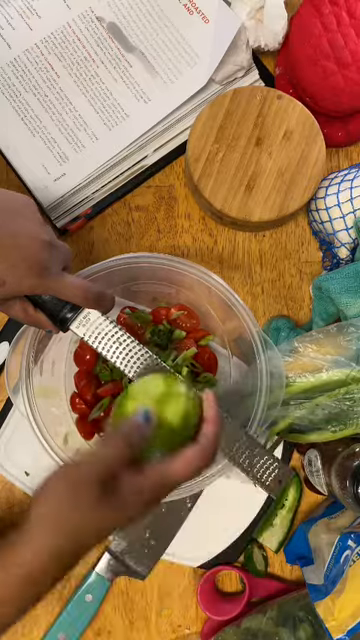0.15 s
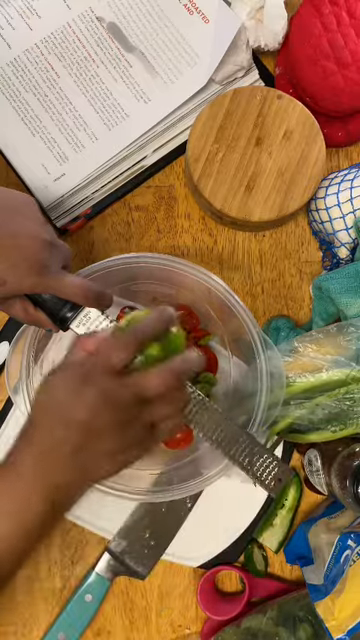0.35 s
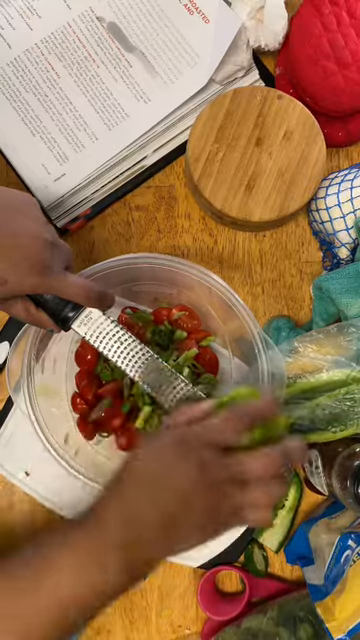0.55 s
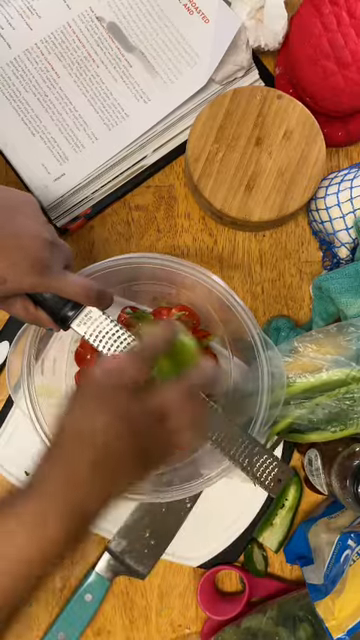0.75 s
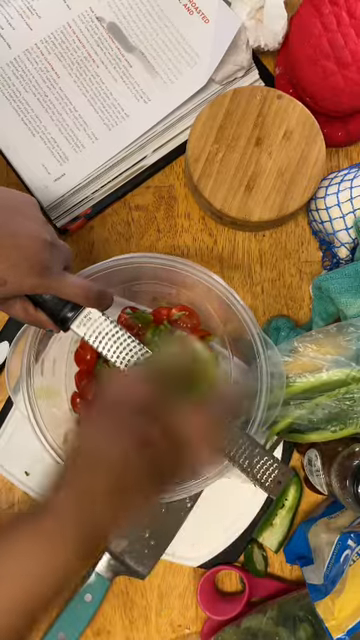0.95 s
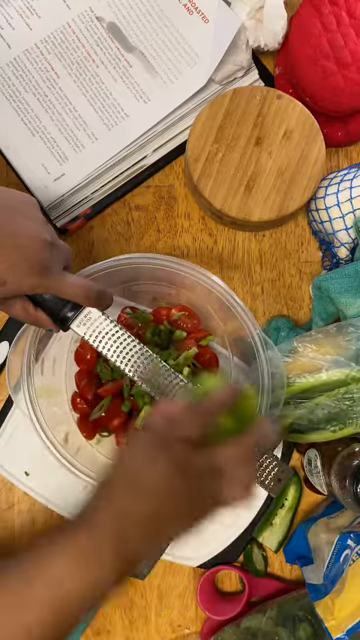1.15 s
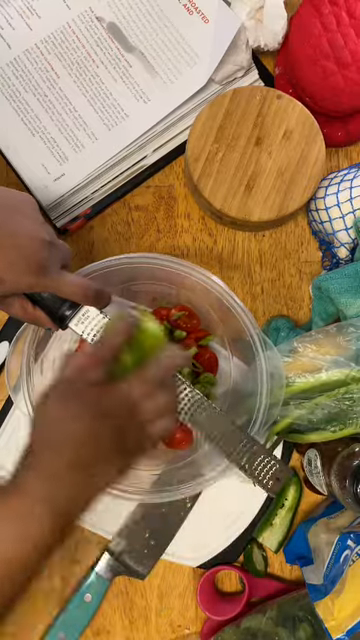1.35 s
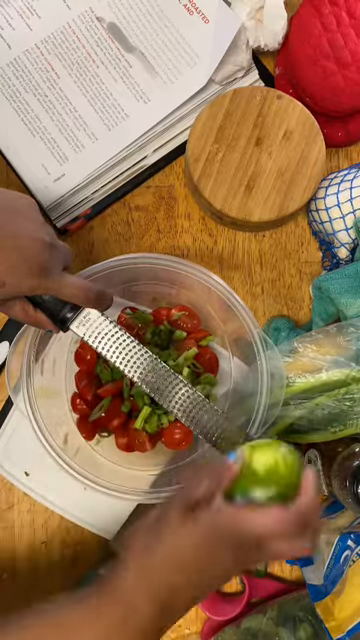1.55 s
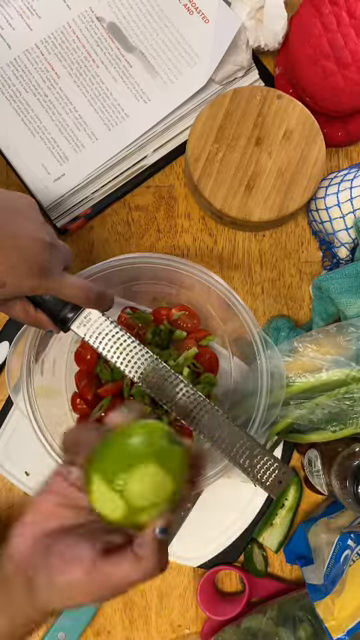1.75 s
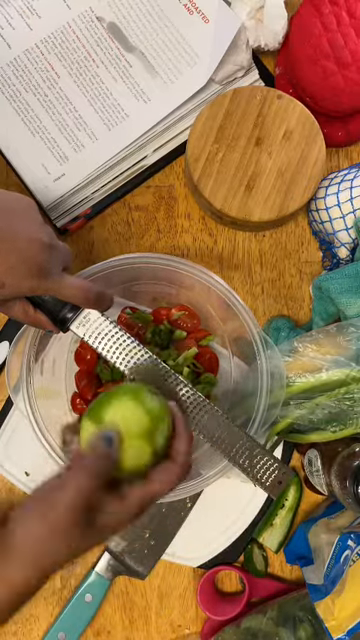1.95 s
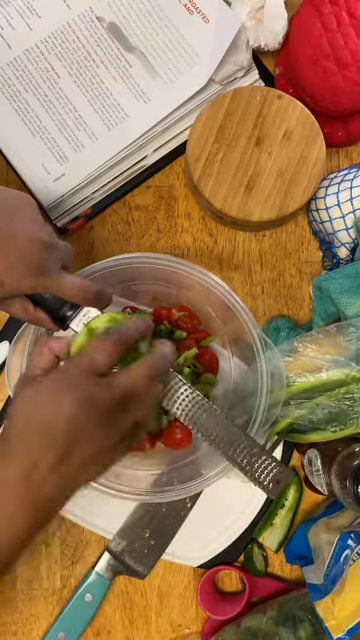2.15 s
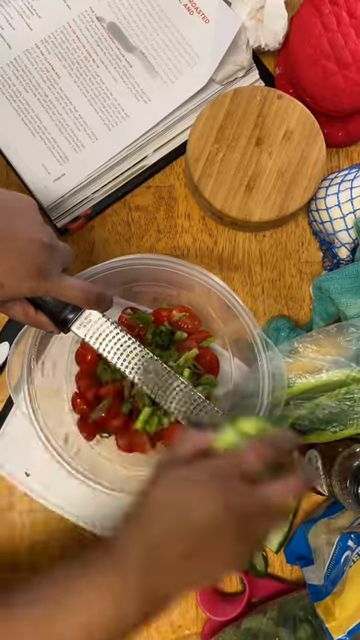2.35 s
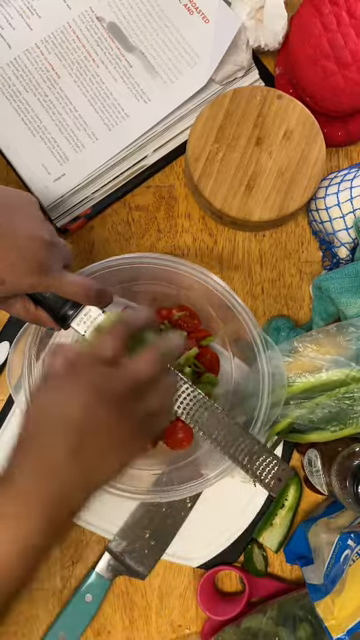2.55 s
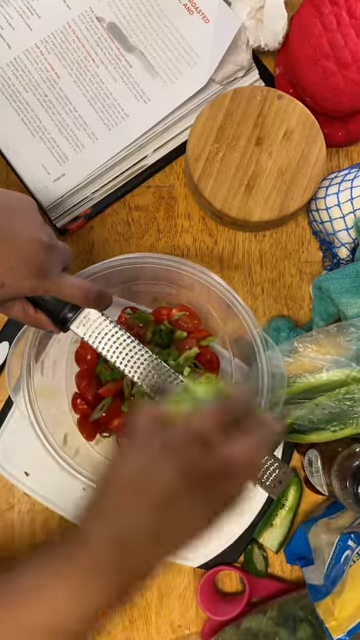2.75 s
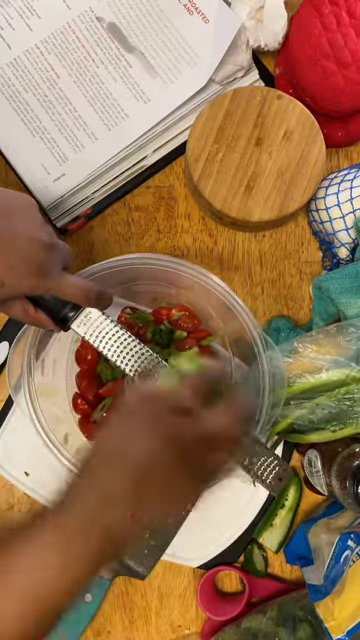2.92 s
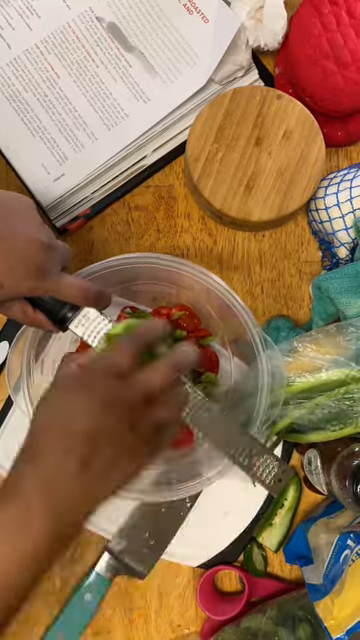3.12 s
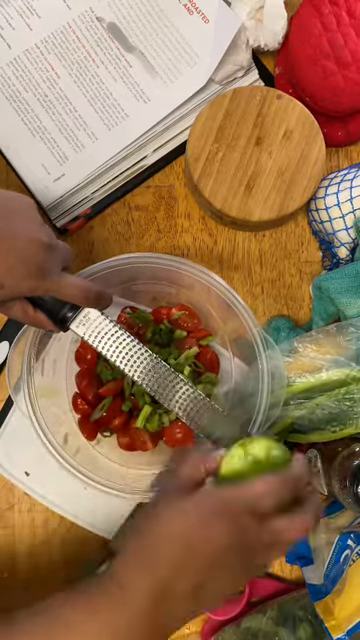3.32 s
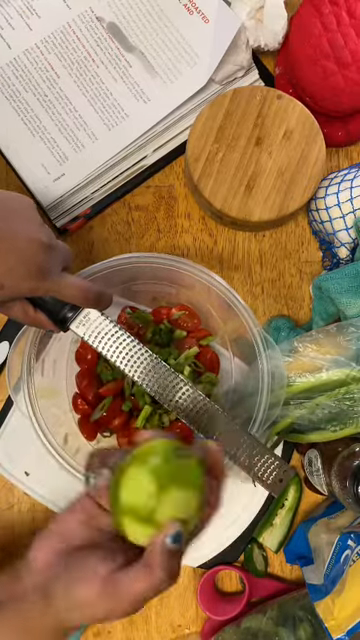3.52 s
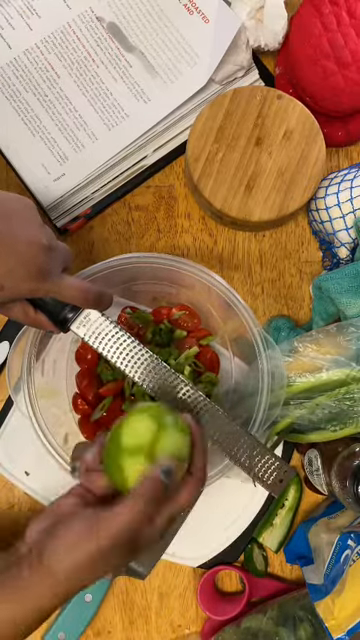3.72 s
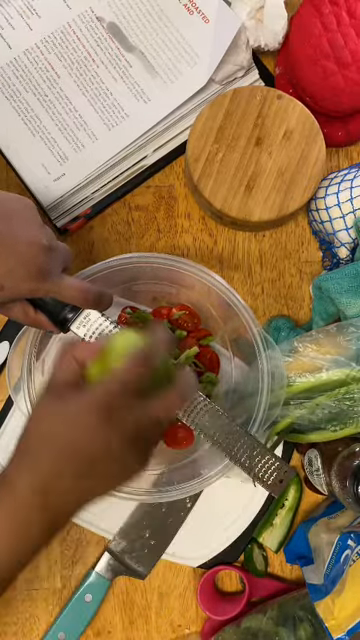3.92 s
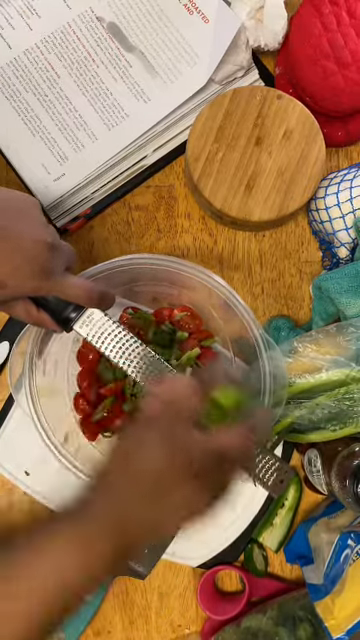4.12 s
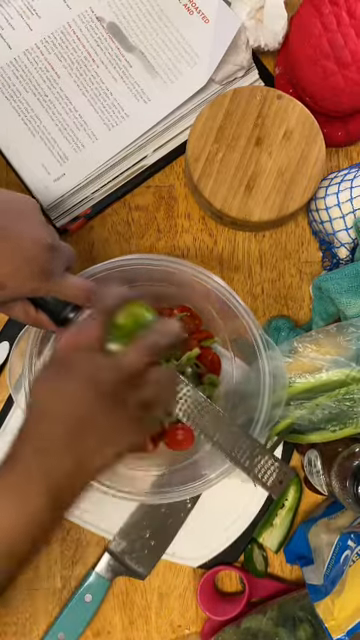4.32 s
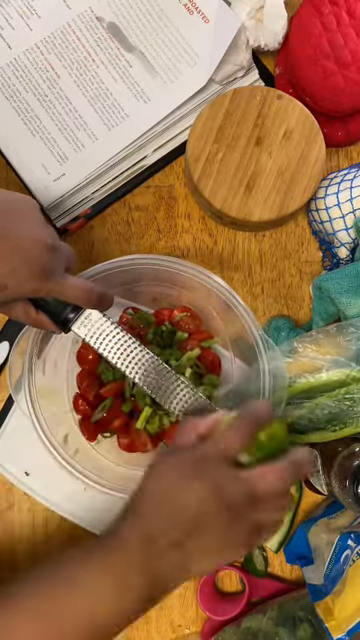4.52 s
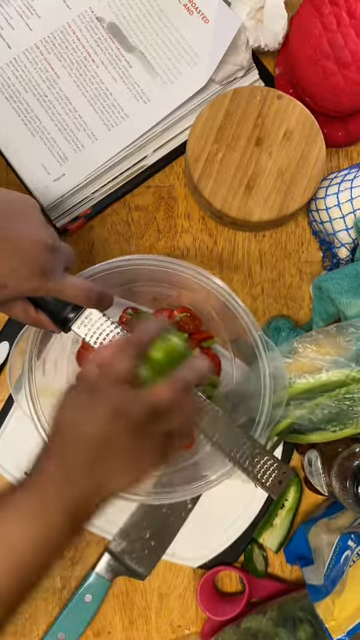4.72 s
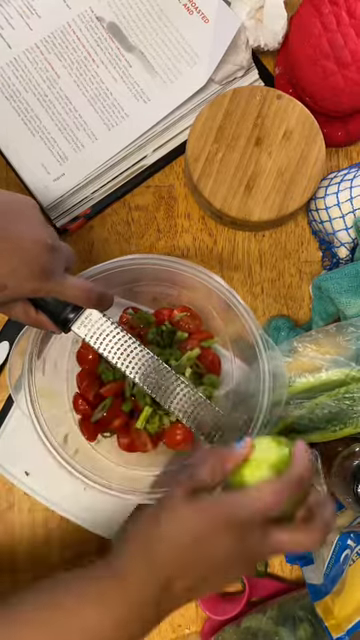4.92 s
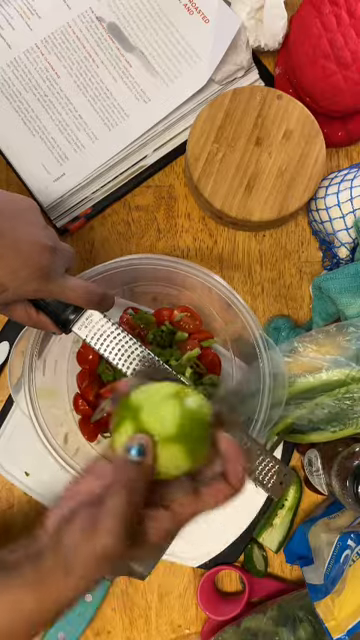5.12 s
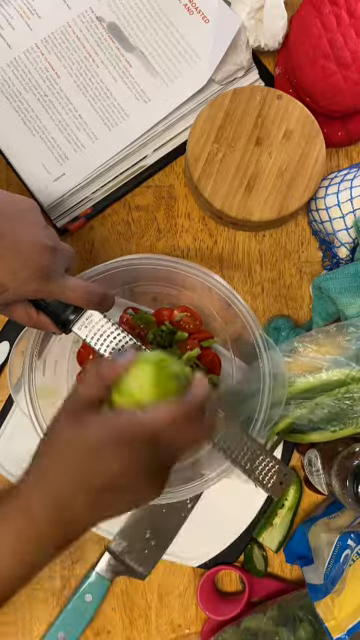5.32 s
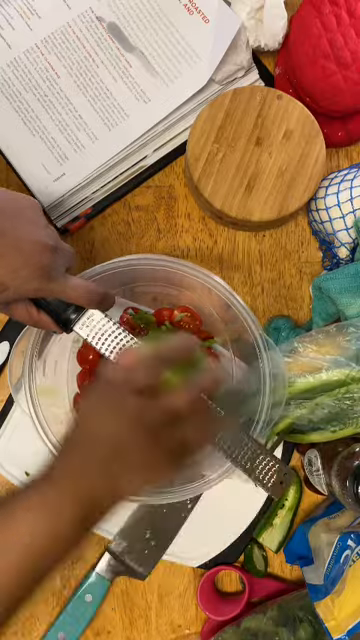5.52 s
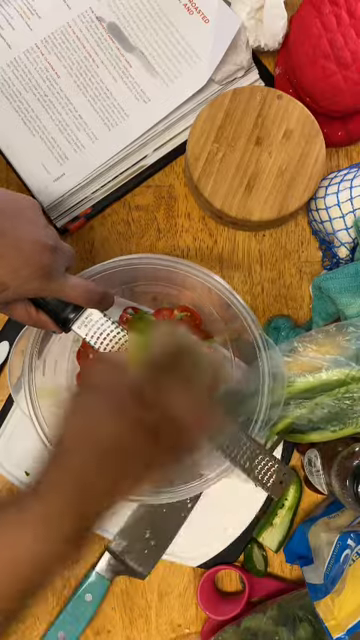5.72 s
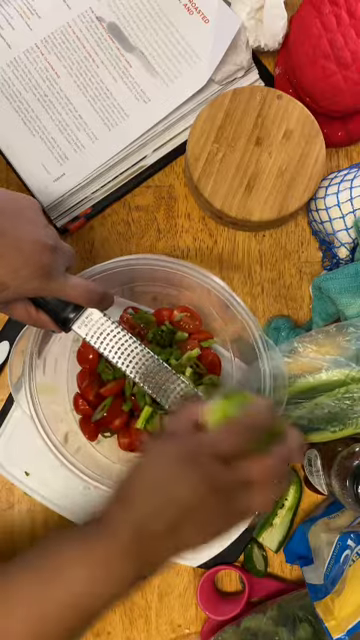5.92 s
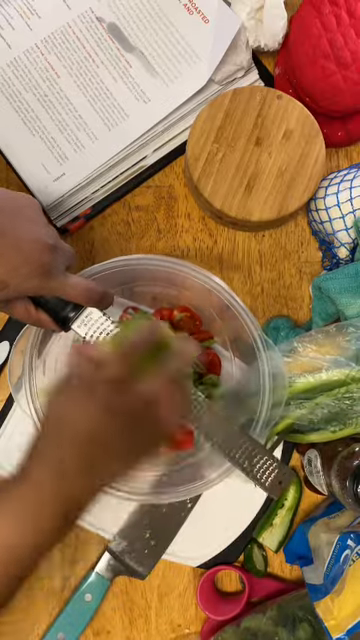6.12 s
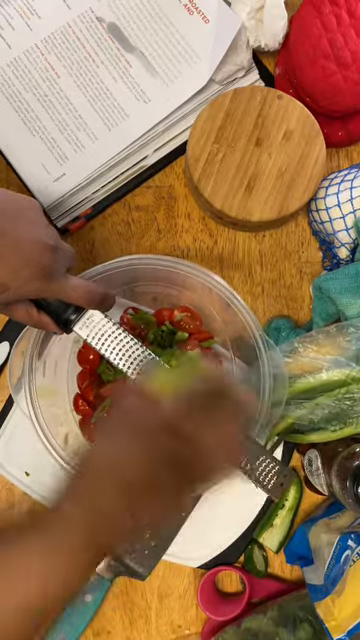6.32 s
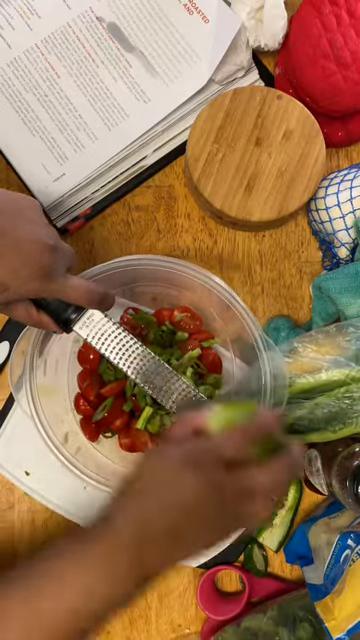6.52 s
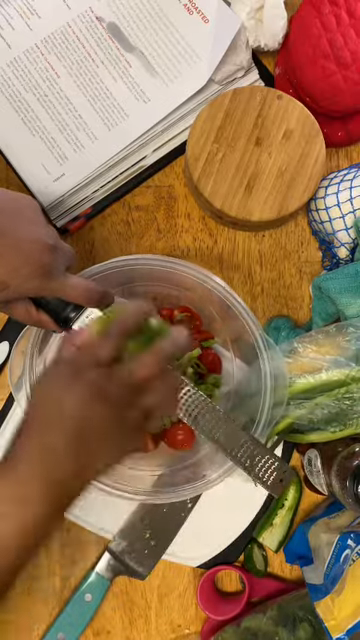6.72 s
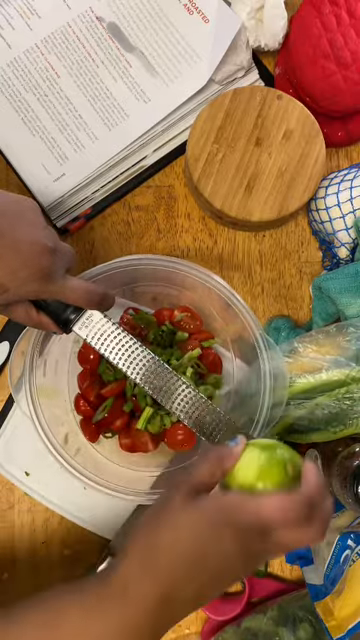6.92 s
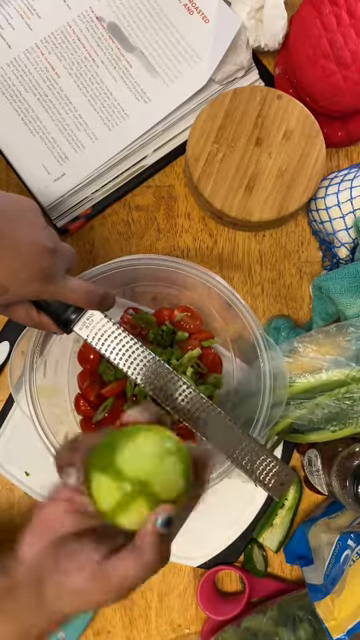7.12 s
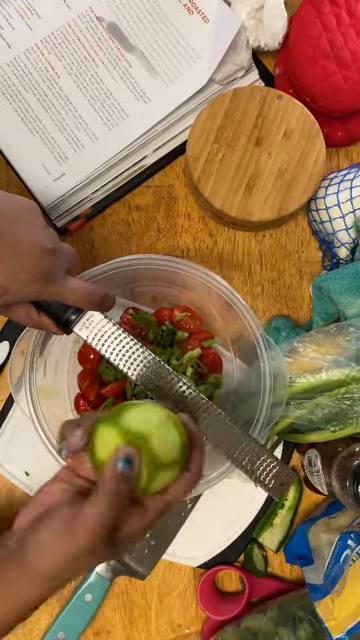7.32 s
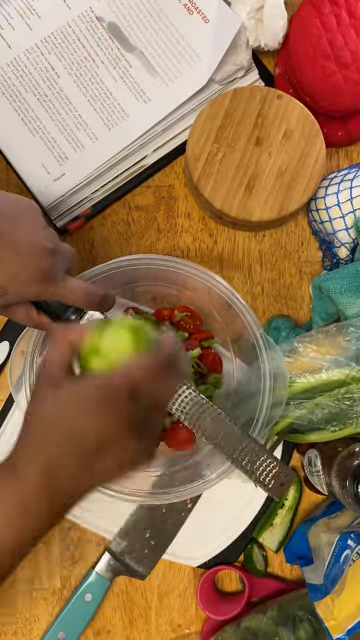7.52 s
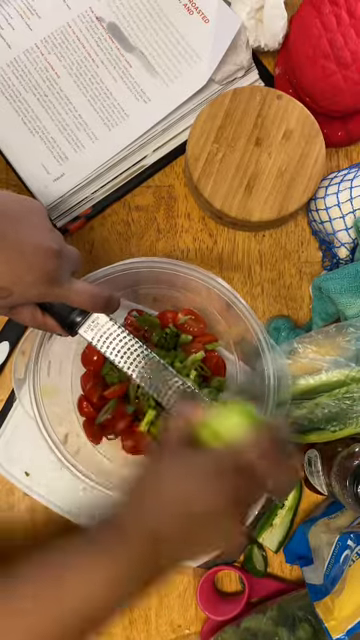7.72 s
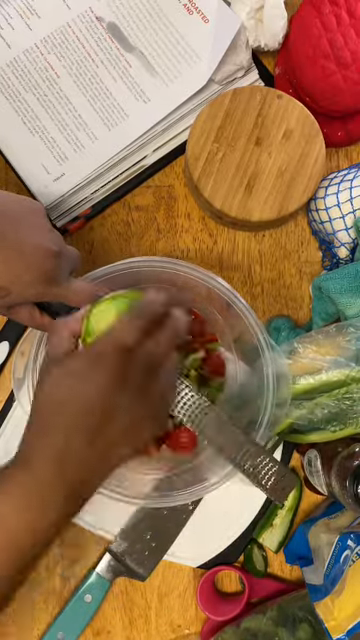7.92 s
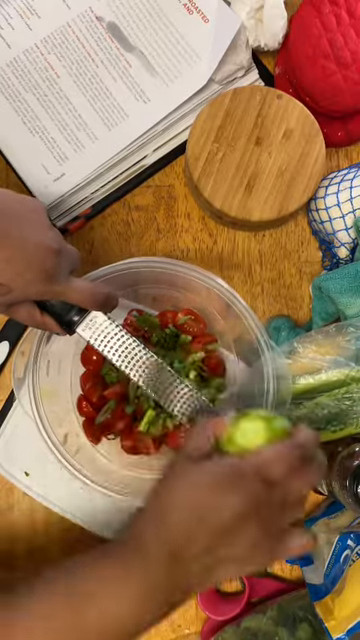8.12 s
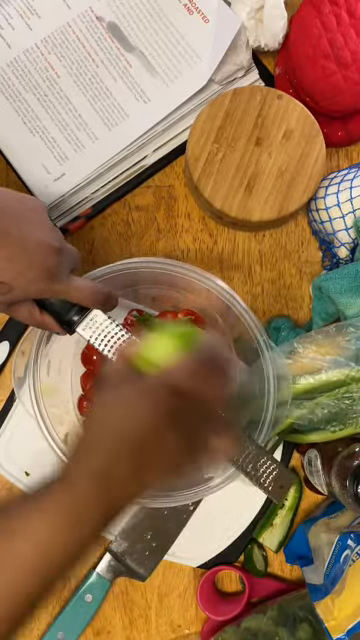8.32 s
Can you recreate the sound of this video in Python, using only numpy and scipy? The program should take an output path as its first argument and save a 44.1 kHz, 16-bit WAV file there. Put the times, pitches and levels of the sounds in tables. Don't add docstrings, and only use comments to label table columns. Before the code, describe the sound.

In a home kitchen, a lime is zested on a fine steel rasp resting across a plastic bowl. Each stroke begins with a sharp, hollow clack and soft counter thud, then a brief, quieter hissing scrape with a low bowl rumble. Strokes come about three per second in groups of three to five, with short pauses as the fruit is turned. A low refrigerator hum continues. Close stereo phone pickup, short room echo.

```python
import sys
import numpy as np
from scipy import signal
from scipy.fft import rfft, irfft, next_fast_len
from scipy.io import wavfile

SR = 44100
rng = np.random.default_rng(int(sys.argv[2]) if len(sys.argv) > 2 else 0)


def invert_db(x):
    u = np.asarray(x, float) / 20
    return 10 ** u


def materialize(psi):
    bounded = np.clip(np.atleast_2d(psi).T, -1, 1)
    quanta = np.round(bounded * 32767).astype(np.int16)
    wavfile.write(sys.argv[1], SR, quanta)


N = 368235
SIZE = next_fast_len(N + SR)
HZ = np.arange(SIZE // 2 + 1) * SR / SIZE + 1e-3
SIDES = np.array([[.5], [-.5]])

# start_s, peak_db, boom_db (bowl, re peak), tick_db (steel, re peak), thud_db (counter)
KNOCKS = [(0.2568, -13, -2, -10.5, -39), (0.6422, -12, -7, -14.5, -25.5), (0.9711, -10.5, -5.5, -12, -26),
          (1.291, -13, -6.5, -15, -33), (2.0942, -38, -4, -15, -33), (2.1005, -24, -8, -17.5, -27),
          (2.5042, -11, -3.5, -11.5, -26.5), (2.815, -9, -6, -15, -17.5), (3.0982, -10.5, -4.5, -10.5, -26),
          (3.931, -17, -5, -12.5, -33), (4.2955, -10, -7.5, -12.5, -29), (4.6411, -9.5, -3, -12.5, -21),
          (5.3921, -17, -4, -13.5, -45), (5.7492, -8, -10.5, -16, -22), (6.0606, -13.5, -6, -12.5, -26.5),
          (6.3756, -6.5, -8, -14.5, -19), (6.681, -8.5, -4, -11.5, -25.5),
          (7.5339, -15.5, -5.5, -15.5, -29), (7.9083, -9.5, -3.5, -12, -20), (8.2347, -9.5, -6.5, -14, -26)]
# pitch_hz, likeness (0 to 1)
HISS_ALIKE = [(500, .6), (1000, .2), (1900, .85), (2700, .4), (4500, .7), (5500, .93), (7400, .985),
              (15000, .985)]
# pitch_hz, left_over_right_db
LEAN = [(200, 0.5), (500, 2), (1000, 5.5), (2500, 0.5), (4500, 1), (6000, 0)]


def rms_one(x):
    return x / np.sqrt(np.mean(x ** 2) + 1e-20)


def at_hz(points):
    hz, value = np.transpose(points)
    return np.interp(np.log(HZ), np.log(hz), value)


def drift(rate_hz):
    r = np.exp(-80 * np.pi * rate_hz / SR)
    slow = signal.lfilter([1], [1, -2 * r, r * r], rng.standard_normal(N // 40 + 2002))[2000:]
    return np.interp(np.arange(N) / 40, np.arange(len(slow)), rms_one(slow))


def diffuse(pair, likeness):
    mid, side = rfft(pair, SIZE)
    alike = np.clip(at_hz(likeness), 0, 1)
    both = np.sqrt(1 + alike) * mid + 2 * SIDES * np.sqrt(1 - alike) * side
    return both * invert_db(SIDES * at_hz(LEAN))


def spread(pair, gain, likeness):
    top_hz = 15850
    return rms_one(irfft(diffuse(pair, likeness) * gain * (HZ < top_hz), SIZE)[:, :N])


def fridge():
    # pitch_hz, level_db, wobble_db
    hum = [
        (123, -43.5, 2.5),
        (193.7, -44, 3),
        (222.1, -31, 2),
        (269, -56, 7),
        (348, -52, 1.5),
    ]
    # pitch_hz, level_db (per Hz)
    air_colour = [(25, -19), (55, -17.5), (130, -7.5), (220, -7.5), (320, -9.5), (500, -10.5), (930, -12.5),
                  (1080, -22), (1700, -24.5), (2300, -23.5), (3500, -29), (6000, -38.5), (10000, -49.5),
                  (15000, -57.5)]
    # pitch_hz, likeness (0 to 1)
    air_alike = [(30, 0.67), (100, 1), (250, 0.9), (450, 0.85), (800, 0.025), (1500, 0.37), (3000, 0.084),
                 (4800, 0.53), (6000, 1), (7400, 1), (15000, 0.62)]
    air_db, air_sway_db = -37, .7
    lines = 0
    for hz, level_db, wobble_db in hum:
        level = invert_db(level_db + 1.5 + wobble_db * drift(rate_hz=3.7))
        pitch_hz = hz + 1.03 * drift(rate_hz=4.06)
        lines = lines + level * np.sin(np.cumsum(2 * np.pi * pitch_hz / SR))
    air = spread(rng.standard_normal((2, N)), invert_db(at_hz(air_colour)), air_alike)
    return lines * invert_db(SIDES * 0.67) + invert_db(air_db + air_sway_db * drift(rate_hz=1.0)) * air


def cracks():
    # pitch_hz, level_db (per Hz)
    crack = [(3000, -15), (5000, 2.5), (7600, -6.5), (8400, -5.5), (9700, -2.5), (10500, -12), (13500, -13),
             (15500, -19), (16000, -26), (16500, -37), (16700, -55)]
    t, spit, brush = np.arange(N) / SR, np.zeros(N), np.zeros(N)
    for start_s, peak_db, _, tick_db, _ in KNOCKS:
        near = slice(round((start_s - .03) * SR), round((start_s + .03) * SR))
        late = t[near] - start_s
        attack = np.clip(late / 0.00096, 0, 1) ** 2
        decay = np.exp(-np.maximum(late, 0) / 0.0014)
        spit[near] += invert_db(peak_db + tick_db + 4) * attack * decay
        brush[near] += invert_db(peak_db - 29) * np.exp(-((late + 0.0027) / 0.0057) ** 2)
    white = rng.standard_normal(N)
    treble = rms_one(irfft(rfft(white, SIZE) * invert_db(at_hz(crack)), SIZE)[:N])
    peel = rms_one(signal.lfilter(*signal.butter(1, [1200, 1800], "band", fs=SR), white))
    return spit * treble + brush * peel * invert_db(SIDES * 4.3)


def mode_level(hz, boom_db, tick_db):
    if hz < 1000:
        return boom_db + 6.5
    if hz < 2600:
        return 3
    if hz < 3500:
        return 9.5 + 0.5 * tick_db
    return tick_db + 17.5


def knocks():
    # pitch_hz, level_db, t60_s, left_over_right_db, left_lead_rad
    body = [(301, -8.5, 0.047, 1.5, 0), (472, -6.5, 0.038, 7.5, 0.53), (649, -3, 0.026, 4, -0.61),
            (781, 3, 0.039, -7.5, -0.54), (1130, -17, 0.007, -4, 0), (1360, -10.5, 0.014, 6, 0.39),
            (1508, 2.5, 0.015, 2.5, -0.19), (1815, -1, 0.017, 1, -0.43), (2058, 1, 0.017, 0.5, 0.00013),
            (2372, -10.5, 0.021, -2, 0.42), (2890, -5, 0.013, -4.5, 0.35), (3017, -2.5, 0.012, -4, 0.37),
            (4016, -7.5, 0.0096, -2.5, 0.022), (4470, -14, 0.013, 2.5, 0.44), (5110, -20.5, .01, -7, 0.2),
            (5896, -14, 0.0099, 2, -0.09), (6580, -19, 0.011, -10, 1)]
    out, t = np.zeros((2, N + 1500)), np.arange(1500) / SR
    luck = rng.standard_normal((len(KNOCKS), 3, len(body)))
    choke = invert_db(-13 / (1 + np.exp(-(t - .0062) / 0.0003)))
    for (start_s, peak_db, boom_db, tick_db, _), (more, detune, turn) in zip(KNOCKS, luck):
        at = round((start_s - .0004) * SR)
        for (hz, level_db, t60, lean_db, lead), m, d, p in zip(body, more, detune, turn):
            own_db = mode_level(hz, boom_db, tick_db)
            swell = 1 - np.exp(-(t * hz ** 0.61 / 0.1) ** 2)
            phase = 2 * np.pi * hz * (1 + .01 * d) * t + SIDES * lead + .35 * p
            gain = invert_db(peak_db + level_db + own_db + 1.2 * m + SIDES * lean_db - 60 * t / t60)
            out[:, at:at + len(t)] += gain * swell * choke * np.sin(phase)
    return out[:, :N]


def after_ring():
    # pitch_hz, level_db, t60_s, left_over_right_db
    ring = [(609.6, -6, 0.12, 14), (681.3, 4, 0.13, -2.5), (765, -3, 0.13, 6), (822, -8.5, 0.3, -7),
            (1392, -4, 0.19, 5), (1457, -4, 0.11, 1), (1620, -15, 0.28, -8), (2356, -3, 0.13, 3),
            (2460, -14.5, 0.22, 0)]
    beat_depth, beat_share = .9, .045
    out, t = np.zeros((2, N + 7000)), np.arange(7000) / SR
    luck = rng.standard_normal((len(KNOCKS), 3, len(ring)))
    uptake = np.tanh((t / 0.0092) ** 2)
    for (start_s, peak_db, boom_db, *_), (more, detune, turn) in zip(KNOCKS, luck):
        at = round(start_s * SR)
        for (hz, level_db, t60, lean_db), m, d, p in zip(ring, more, detune, turn):
            mode_db = peak_db + 0.62 * boom_db + level_db - 13 + 1.5 * m
            gain = invert_db(mode_db + SIDES * lean_db - 60 * t / t60)
            beat = 1 + beat_depth * np.sin(2 * np.pi * hz * beat_share * (1 + .3 * m) * t + 5 * d)
            phase = 2 * np.pi * hz * (1 + 0.02 * d) * t + SIDES * 1.0 + 3 * p
            out[:, at:at + len(t)] += gain * beat * uptake * np.sin(phase)
    return out[:, :N]


def kitchen(x):
    # low_hz, high_hz, t60_s, level_db
    bands = [(248, 830, 0.26, -34.5), (798, 1010, 0.17, -37.5), (1320, 2210, 0.29, -38.5),
             (2230, 3410, 0.25, -37.5), (3750, 7400, 0.23, -39), (7000, 22000, 0.18, -40)]
    t = np.arange(16000) / SR
    early = np.clip((t - .003) / 0.0012, 0, 1) * (1 + 0.28 / (1 + np.exp((t - .03) / 0.0052)))
    white, response = rng.standard_normal((2, len(t))), 0
    for low_hz, high_hz, t60, level_db in bands:
        band = signal.butter(2, [low_hz, high_hz], "band", fs=SR, output="sos")
        response = response + signal.sosfilt(band, white * early * invert_db(level_db - 60 * t / t60))
    echo = diffuse(response, HISS_ALIKE)
    return irfft(rfft(x.mean(axis=0), SIZE) * echo, SIZE)[:, :N]


def thuds():
    out, t = np.zeros(N + 4000), np.arange(4000) / SR
    fall = 72 * t + 0.91 * (1 - np.exp(-t / 0.0099))
    swing = (t / .008) ** 2 * np.exp(-t / 0.0038) * np.sin(2 * np.pi * fall)
    heave = (t / .02) ** 2 * np.exp(-t / 0.015) * np.sin(2 * np.pi * 52 * t)
    shape = swing / np.abs(swing).max() + invert_db(-20) * heave / np.abs(heave).max()
    for start_s, *_, thud_db in KNOCKS:
        at = round((start_s + 0.0059) * SR)
        out[at:at + len(t)] += invert_db(thud_db + 1.5) * shape
    return out[:N]


def stroke_levels():
    # bite_s, swell_s (to full pressure), length_s (to lift-off), hiss_db,
    # rumble_db (bowl, re hiss)
    strokes = [(0.373, 0.036, 0.1, -51.5, 7.5), (.695, 0.077, .13, -53, 11.5),
               (1.04, 0.017, 0.11, -49.5, 6.5), (1.35, .03, 0.1, -51.5, 10.5),
               (2.213, 0.017, 0.11, -50, 5.5), (2.554, 0.037, 0.078, -49.5, 9),
               (2.856, .012, 0.066, -50.5, -2), (3.147, 0.047, 0.098, -52.5, 10),
               (4.022, 0.062, 0.11, -51, 9), (4.355, .02, 0.093, -50.5, 10.5),
               (4.69, 0.022, 0.12, -51.5, 11.5), (5.476, .038, 0.087, -49.5, 11),
               (5.79, .055, .093, -51.5, 10.5), (6.111, .034, 0.077, -50.5, 11),
               (6.418, 0.044, 0.09, -53, 7), (6.726, 0.046, 0.1, -53.5, 11), (7.615, 0.017, .105, -48, 9),
               (7.95, .015, 0.1, -51, 10), (8.285, 0.016, .101, -50, 11.5)]
    onset_s, release_s = 0.037, 0.048
    hiss_arc = np.array([-26, -2.5, 0, -5, -26])
    rumble_arc = np.array([-2, -5, 0, 1, -2])
    hiss_db, body_db, t = np.full(N, -120.), np.zeros(N), np.arange(N) / SR
    for bite, swell, length, level_db, rumble_db in strokes:
        full = bite + np.clip(swell, .002, length - .002)
        s = [bite - onset_s, bite, full, bite + length, bite + length + release_s]
        edges = [s[0] - .02, *s, s[-1] + .03]
        hiss_db = np.maximum(hiss_db, np.interp(t, edges, [-120, *(level_db + hiss_arc), -120]))
        body_db = np.where(t > s[0] - .02, np.interp(t, s, rumble_db + rumble_arc), body_db)
    return hiss_db, body_db


def teeth(tears):
    pitches = np.geomspace(500, 15000, num=14)
    dealt = rng.integers(0, len(pitches), tears.shape)
    out = 0
    for k, hz in enumerate(pitches):
        plucks = tears * (dealt == k) + 1e-18
        out = out + signal.lfilter(*signal.iirpeak(hz, 3.5, fs=SR), plucks)
    return out


def rasp():
    # pitch_hz, level_db (per Hz)
    hiss_colour = [(300, 3), (1000, -19), (2500, 0), (4000, -1), (5500, 1), (6800, -1.5), (7700, 5),
                   (8800, 0), (10000, -1.5), (12500, -6.5), (15600, -8.5)]
    # pitch_hz, width_hz, level_db
    rumble = [(688, 76, 11.5), (1445, 180, 5.5), (1970, 660, -2.5), (2770, 580, -29)]
    hiss_db, body_db = stroke_levels()
    sizes = invert_db(1.0 * np.minimum(rng.exponential(1, (2, N)), 4)) * rng.choice([-1, 1], (2, N))
    happens = rng.random((2, N)) < 14000 / SR
    tears = teeth(sizes * happens * invert_db(0.58 * drift(rate_hz=80)))
    hiss = spread(tears, invert_db(at_hz(hiss_colour)), HISS_ALIKE)
    bowl = 0
    for k, (hz, width_hz, level_db) in enumerate(rumble):
        bowl = bowl + (-1) ** k * invert_db(level_db) / (1 + 1j * (HZ - hz ** 2 / HZ) / width_hz)
    hiss_db = hiss_db + 0.93 * drift(rate_hz=25)
    return invert_db(hiss_db + 10) * hiss + invert_db(hiss_db + body_db) * spread(tears, bowl, HISS_ALIKE)


def scene():
    hum = fridge()
    hits = cracks() + knocks() + after_ring()
    drag = rasp()
    return hum + hits + thuds() + drag + kitchen(hits + invert_db(1) * drag)


def top_cut(x):
    return signal.sosfilt(signal.butter(12, 17000, fs=SR, output="sos"), x)


def record(dry):
    # pitch_hz, left_lead_rad
    twist = [(0, 0), (4000, .4), (5100, .3), (7350, 3.14), (10500, 6.28), (13100, 9.1), (14300, 9.9),
             (16000, 12.7)]
    lead = np.interp(HZ, *np.transpose(twist))
    x = irfft(rfft(dry, SIZE) * np.exp(1j * SIDES * lead), SIZE)[:, :N]
    return top_cut(1.344 * np.tanh(x / 1.274))


dry = scene()
out = record(dry)
materialize(out)
```